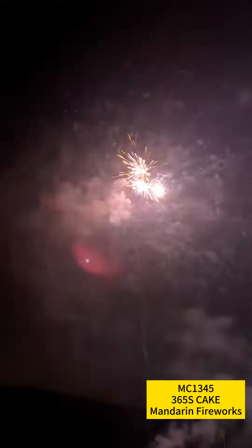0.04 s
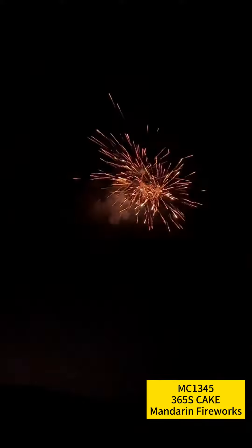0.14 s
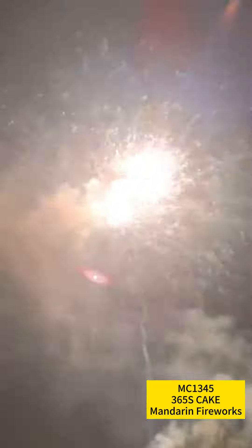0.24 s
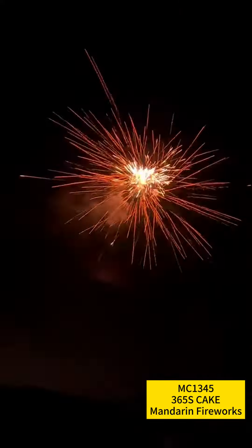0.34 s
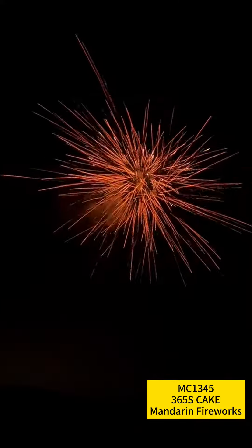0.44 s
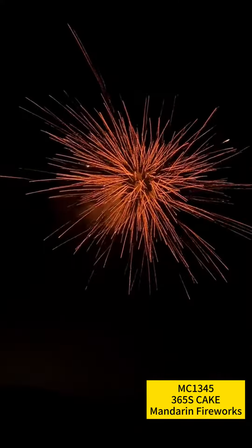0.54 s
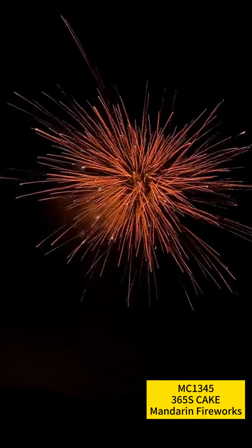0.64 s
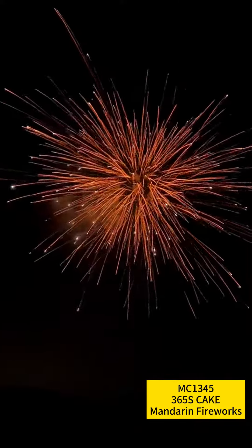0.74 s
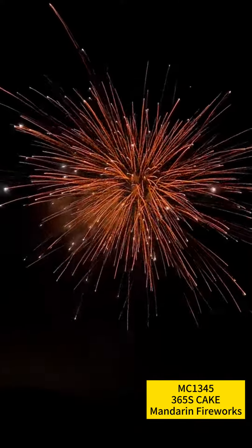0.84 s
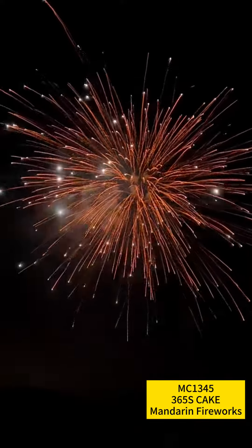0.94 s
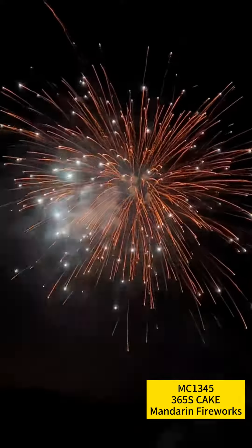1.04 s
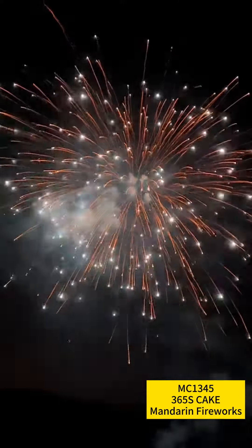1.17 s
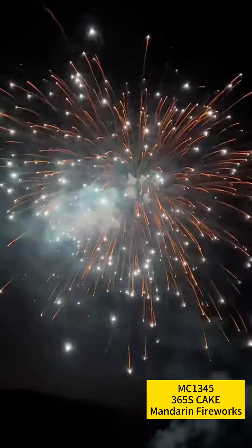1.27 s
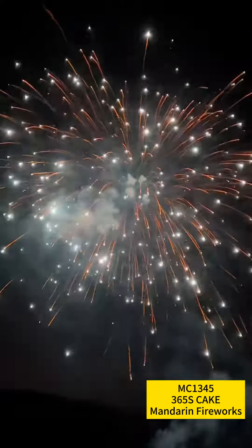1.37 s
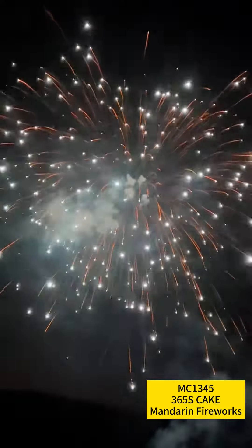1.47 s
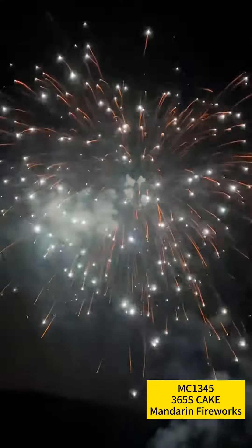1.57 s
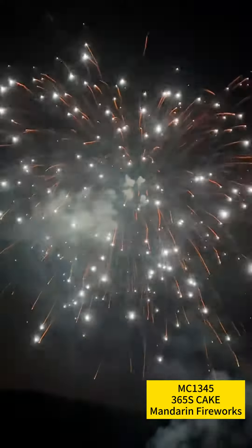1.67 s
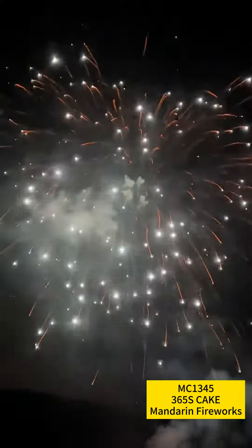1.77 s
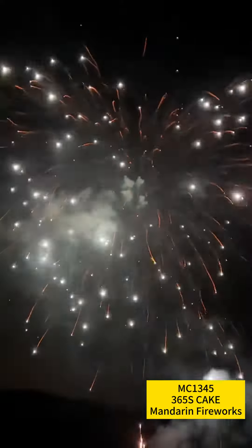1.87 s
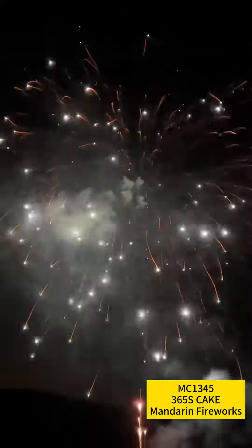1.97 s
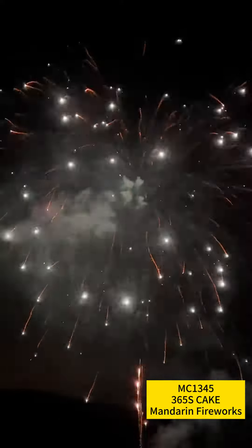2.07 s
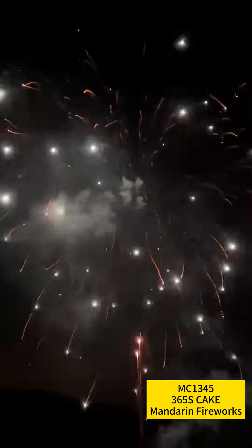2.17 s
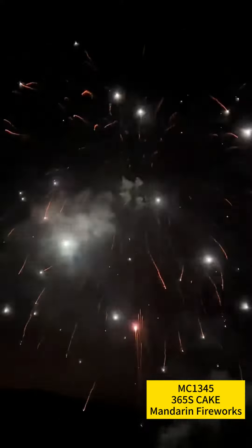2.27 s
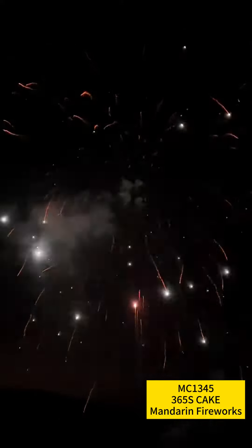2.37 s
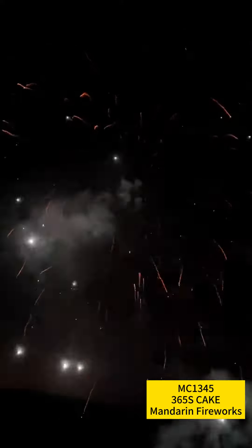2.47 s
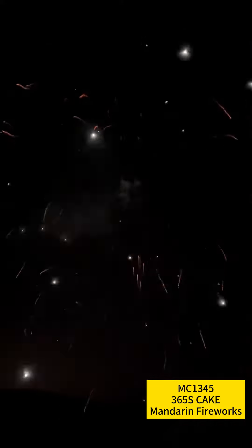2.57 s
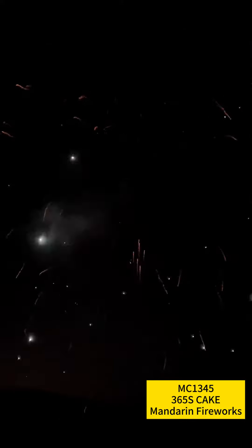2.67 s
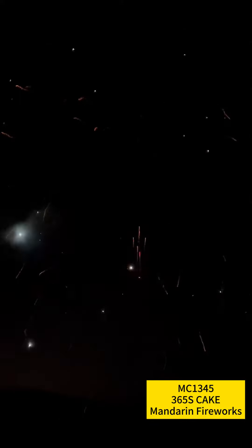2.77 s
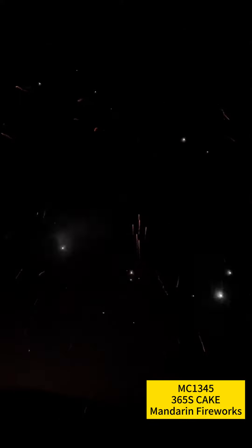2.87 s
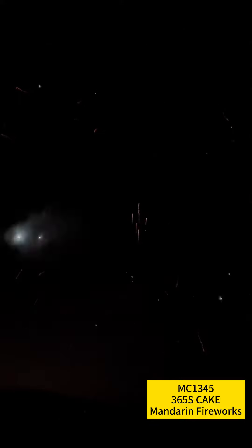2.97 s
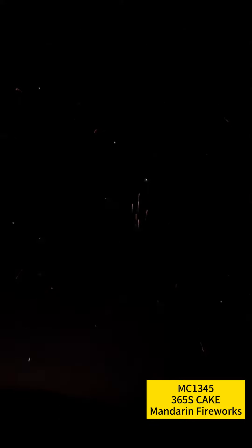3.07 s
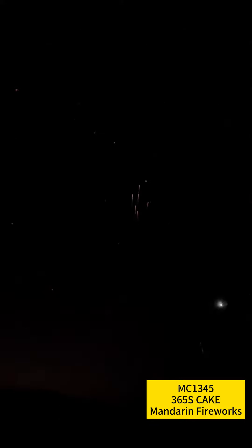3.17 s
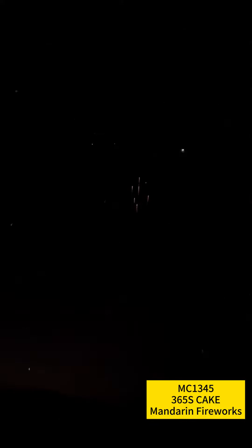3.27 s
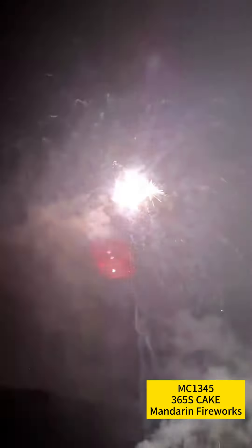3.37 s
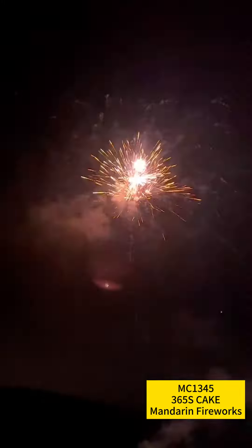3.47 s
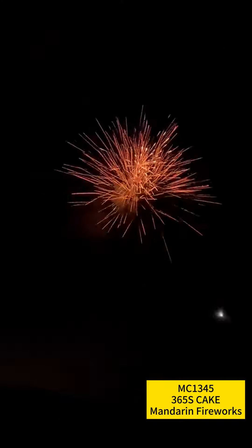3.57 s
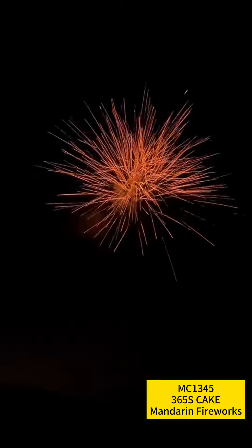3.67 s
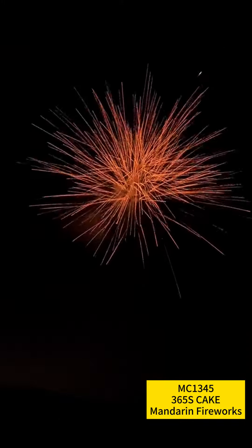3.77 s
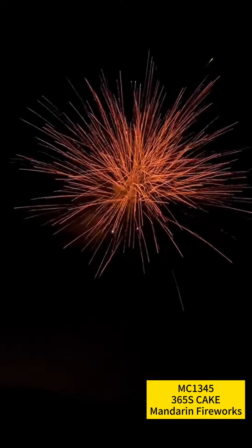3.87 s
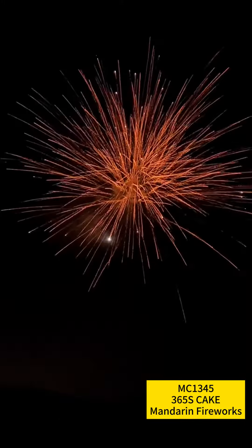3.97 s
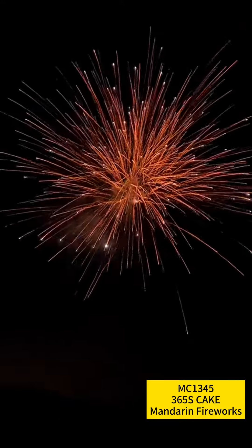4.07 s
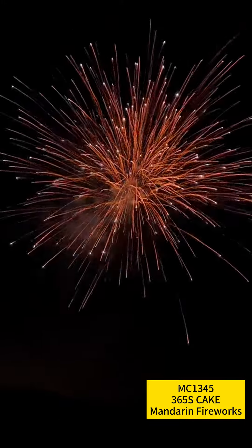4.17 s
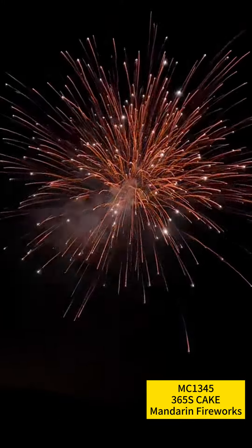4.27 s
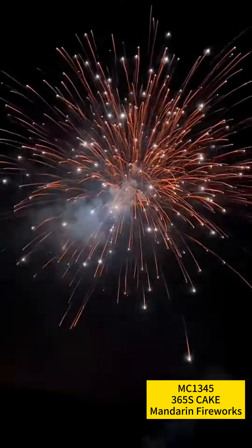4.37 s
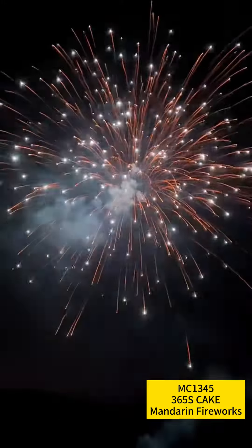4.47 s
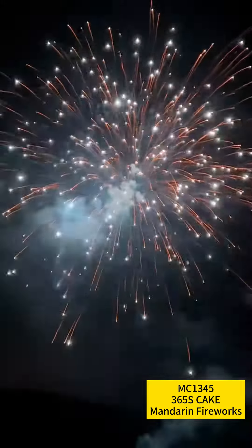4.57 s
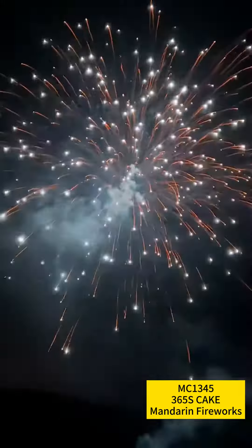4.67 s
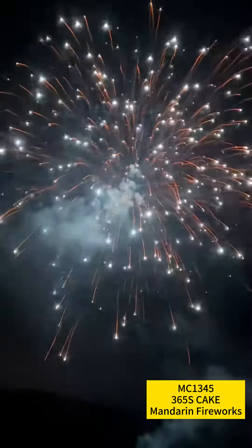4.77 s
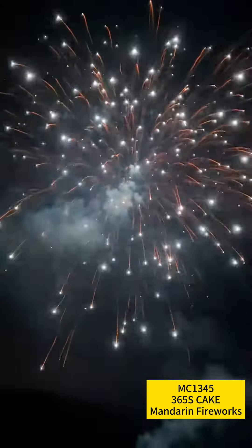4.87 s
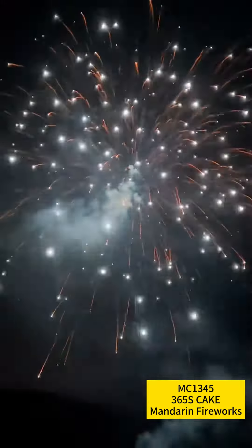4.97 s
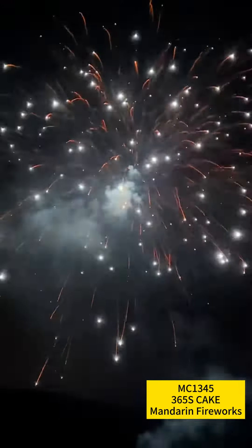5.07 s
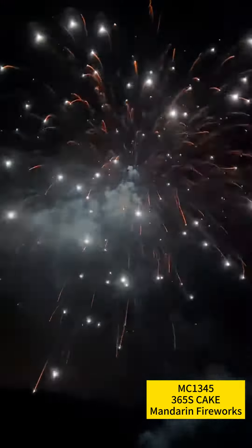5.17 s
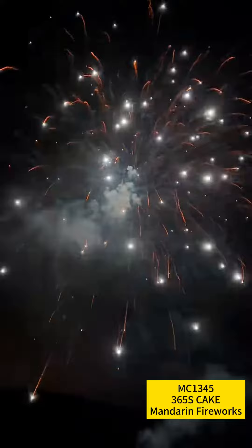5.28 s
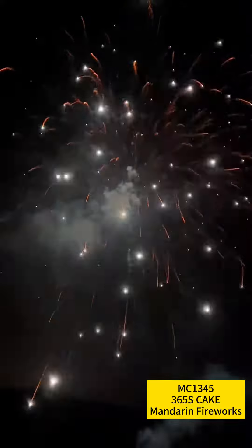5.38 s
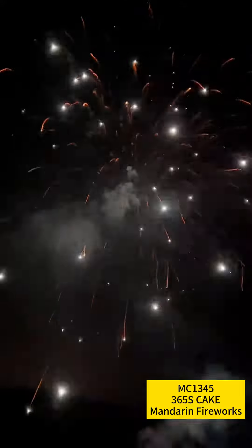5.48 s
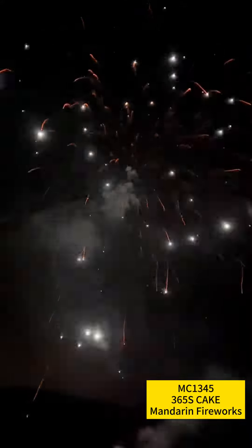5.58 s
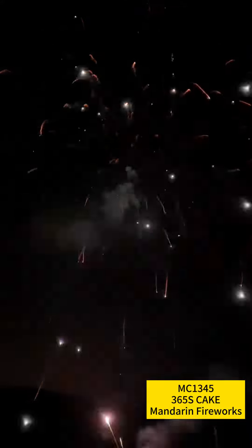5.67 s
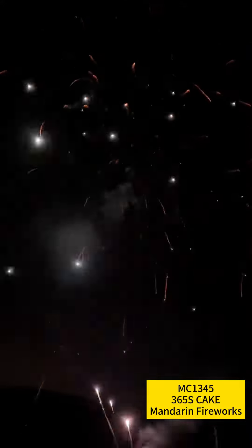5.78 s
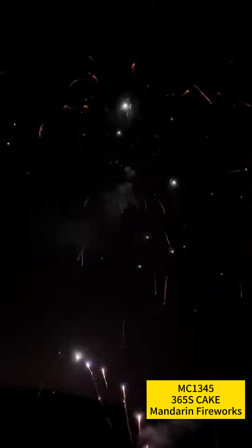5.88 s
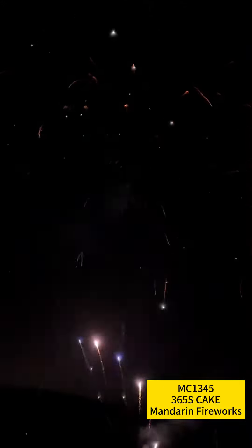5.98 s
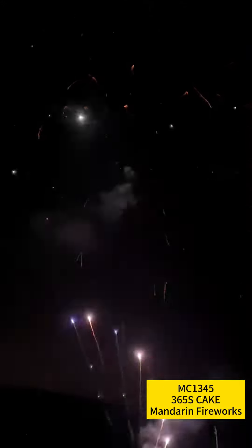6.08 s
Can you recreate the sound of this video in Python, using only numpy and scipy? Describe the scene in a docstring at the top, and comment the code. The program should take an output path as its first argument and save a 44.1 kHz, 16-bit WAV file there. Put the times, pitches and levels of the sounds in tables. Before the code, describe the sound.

Night in open country, with a faint, steady far rumble. At about 0.25 s firework shells burst overhead: three cracks almost merge, then three more follow between 0.43 and 0.53 s, extremely loud, sharp and crunchy as the small stereo recorder overloads. Ground slaps follow at once; a thunderous echo swells around 1.2 s and rolls away, losing treble. From 1.9 to 2.05 s, six quick hollow launch pops patter on the right, about 30 ms apart, each a crack over a small thump, leaving a thin airy hiss. The rumble keeps sinking until 3.6 s, when five bangs crash together within about 0.12 s, again answered by rolling land echoes, renewed near 4.4 s. From 5.6 s stronger tube pops start in a quick cluster, then come every 0.06 to 0.08 s, knocking and thumping on the right until about 6.1 s, with short echoes.

```python
"""Open country at night: a multi-shot firework cake, heard through a small stereo recorder.
Shells burst overhead in two salvos as pressure jumps with a double front; each returns from the ground
at once, from far walls later, and as filtered noise from the landscape for seconds, ever duller.
Lift charges pop on the right: a crack and a swell of noise ring tube resonances, over a low thump.
A steady far rumble of shaped noise lies beneath."""
import sys
import numpy as np
from scipy import signal
from scipy.fft import rfft, irfft, next_fast_len
from scipy.io import wavfile

SR = 44100
rng = np.random.default_rng(int(sys.argv[2]) if len(sys.argv) > 2 else 0)


def inscribe(sig):
    """Save sig as 16-bit PCM at rate SR to the path in sys.argv[1].

    A 1-D sig is mono; a 2-D sig holds one channel per row.
    Samples are clipped to [-1, 1] before scaling.
    """
    pcm = np.round(np.clip(np.atleast_2d(sig).T, -1, 1) * 32767)
    wavfile.write(sys.argv[1], SR, pcm.astype(np.int16))


N = 270774
LEFT_RIGHT = np.array([[1], [-1]])   # sign of a level difference in the two channels

# Shell bursts overhead: [t/s, relative level/dB, blast length/ms, left minus right/dB,
# second front delay/ms, second front level/dB, ground bounce delay/ms, bounce level/dB,
# bounce tick level/dB, tick delay/ms, extra cliff delay/ms, cliff echo level/dB,
# near land scatter level/dB (also sets the overload hash), far land scatter level/dB]
BURST_EVENTS = [(0.2443, -6.5, 1.76, -8, 0.73, -2, 13.5, -21.5, -23.5, 12, -0.1, -25.5, -2, -0.5),
                (0.2594, -13, 2.8, 6, 0.62, -11.5, 11.7, -9, 7.5, 11.6, 0.6, -14.5, 1.5, -1.5),
                (0.286, -3.5, 0.63, 5, 0.75, -8.5, 12.6, -12, -15, 12, -1.1, -23, -3, -6),
                (.4320, -2.5, 1.87, 3, 0.66, -7, 11.6, -14, -7, 12.5, 0.9, -24, -1.5, 0.5),
                (0.5059, -0.5, 1.6, 1.5, 0.64, 0, 12, -13.5, -13.5, 13.4, -3, -25, -1, -6.5),
                (0.5337, -5, 0.72, 6.5, 0.93, -7.5, 13, -10.5, -3.5, 13.4, 2, -22.5, -3, -8),
                (3.597, 0.5, 1.77, 2.5, 0.71, -1, 11.3, -21.5, -15, 12.3, 0.2, -26.5, 1.5, 3),
                (3.6172, -8, 1.43, 8, 1.07, -6.5, 13, -7, -1, 11.5, 0.7, -14, -3.5, 1.5),
                (3.62, -16, 2.4, -1, 0.7, 4, 15, -24, -2, 11.4, 3, -14.5, -5.5, -3),
                (3.6686, -4.5, 2, 4.5, 1.37, -11, 13.4, -18, -8, 12.2, 0.7, -22.5, -3, 1),
                (3.72, -6.5, 1.94, 4, 1.53, -15, 11.3, -14, -9, 13.3, -3.5, -18, -5, -10.5)]
# Lift charges in the tubes: [t/s, pop level/dB, thump level/dB, left minus right/dB,
# ground bounce level/dB, bounce delay/ms, land scatter level/dB,
# first, second, fourth and fifth resonance f/Hz, extra level of each of five resonances/dB]
LIFT_EVENTS = [(1.8976, -21, -17, -3.5, -4, 6.2, -18.5, 1040, 2250, 4300, 6250, 4, -2, 5, -10, 2),
               (1.9307, -16.5, -13, -6, -1, 6.7, -14, 990, 2500, 5240, 6500, 4, -2.5, 4, -8, -11),
               (1.9563, -17.5, -17, -8, -5, 6.6, -14, 947, 2220, 4140, 6200, 1.5, -4, 4, -2, -8),
               (1.9848, -18, -18.5, -3, -2.5, 7, -20.5, 1080, 2170, 5000, 6000, 4, -5.5, 5, -1, 21),
               (2.0156, -17.5, -15.5, -7.5, -3, 7, -19, 950, 2310, 4400, 6200, 3.5, -1.5, 1, 4.5, 0),
               (2.0458, -17.5, -18.5, -5, -6.5, 7, -17, 940, 2260, 5430, 6250, 7.5, 2, 6, 3.5, 3),
               (5.609, -10, -39, -5.5, 3, 7.6, -11.5, 1100, 2330, 4270, 6000, -10, -5.5, 4.5, -8, -1),
               (5.6302, -13.5, -27, -10, -8, 6.5, -15, 1090, 2550, 4650, 6950, -10, -1, 3.5, 1, -5),
               (5.6423, -17, -14.5, -8.5, -1, 5.8, -16, 920, 2340, 4120, 7000, 6, 1, 13.5, 3, -5),
               (5.7301, -10, -12, -5, 0, 6.2, -8, 1130, 2320, 5360, 6500, 2.5, -6.5, 6, -4.5, -19),
               (5.7855, -13.5, -12, -8, 0.5, 6.4, -12.5, 900, 2160, 4700, 6300, 4.5, -3.5, 2, -12, -16),
               (5.8659, -14, -11, -2.5, -4.5, 7, -12, 925, 2680, 5150, 6160, 1.5, -5.5, 9, 2.5, -13),
               (5.9403, -10, -11, -5, -2.5, 6.6, -9.5, 950, 2040, 4930, 7100, -0.5, -12.5, 2, -1, 14.5),
               (6.0126, -9.5, -9.5, -7, 2.5, 6.1, -11, 980, 2330, 4300, 6940, -1.5, -8.5, 3.5, -12, 4),
               (6.0959, -8.5, -10, -5, -0.5, 6.3, -7, 970, 2360, 5240, 6500, 0, -1.5, 8, -7, -21)]


def from_db(db):
    """Amplitude ratio of a level: 20 dB are a factor of ten."""
    return np.exp(np.asarray(db) * (np.log(10) / 20))


def rms_one(x):
    """Normalise the effective value (root mean square) to 1."""
    return x / np.sqrt(np.mean(x ** 2) + 1e-20)


def at_hz(points, hz):
    """Interpolate a spectrum linearly along logarithmic frequency."""
    points = np.array(points)
    return np.interp(np.log(hz), np.log(points[:, 0]), points[:, 1])


def butter(x, hz, kind, order=2):
    """Butterworth filter: maximally flat passband."""
    sections = signal.butter(order, hz, kind, fs=SR, output="sos")
    return signal.sosfilt(sections, np.asarray(x) + 1e-18)


def resonance(x, hz, width_hz):
    """Damped resonator: a pole pair passes a band around hz with a peak gain of about 1."""
    r = np.exp(-np.pi * width_hz / SR)
    zeros = np.array([1, 0, -1]) * (1 - r * r) / 2
    poles = [1, -2 * r * np.cos(2 * np.pi * hz / SR), r * r]
    return signal.lfilter(zeros, poles, x + 1e-18)


def later(x, s):
    """Propagation delay of s seconds."""
    lag = round(s * SR)
    return np.concatenate([np.zeros(lag), x[:N - lag]])


def drift(rate_hz):
    """Slow random fluctuation of rms 1: white noise through two equal low-pass poles."""
    r = np.exp(-80 * np.pi * rate_hz / SR)   # one step spans 40 samples
    noise = rng.standard_normal(N // 40 + 2002)
    slow = signal.lfilter([1], [1, -2 * r, r * r], noise)[2000:]
    return np.interp(np.arange(N) / 40, np.arange(len(slow)), rms_one(slow))


def clicks(rows, column):
    """Impulse excitation: one impulse an event, its level taken from a column."""
    out = np.zeros(N)
    for row in rows:
        out[round(row[0] * SR)] += from_db(row[column])
    return out


def blast(length_ms):
    """Blast wave: a pressure jump decays through zero after length_ms into a suction phase."""
    u = np.arange(SR // 20) / SR / (length_ms / 1000)
    return (1 - u) * np.exp(-u)


def puff(hits, fade_s):
    """Exponential decay: dying noise after each hit, partly own to each channel."""
    r = np.exp(-1 / (fade_s * SR))
    shared, own = rng.standard_normal(N), rng.standard_normal((2, N))
    envelope = signal.lfilter([1], [1, -r], hits + 1e-18)
    return envelope * (0.41 * shared + 0.2 * own)


def banded_noise(spectrum, patchy_db, high_grain, shape=lambda hz: 0, octaves=.5):
    """Partly coherent noise in bands: each has its level over time and its left-right correlation."""
    # Coherence of the channels: [f/Hz, left-right correlation]
    likeness = [(60, 1), (180, 0.97), (550, 0.58), (1650, 0.03), (4970, 0.63), (15000, 0.16)]
    # Balance of the channels: [f/Hz, left minus right/dB]
    balance = [(60, 1), (240, -1), (950, -1.5), (3770, -1), (15000, 2.5)]
    out, power, together = 0, 0, drift(25)
    edges = 30 * 2 ** np.arange(0, 9.1, octaves)
    white = rng.standard_normal((2, 2, N))   # neighbouring bands use different noise
    for k, (low, high) in enumerate(zip(edges, edges[1:])):
        mid, side = butter(white[k % 2], [low, high], "band", order=3)
        hz = np.sqrt(low * high)
        alike = np.clip(at_hz(likeness, hz), -1, 1)
        lean = from_db(at_hz(balance, hz) / 2 * LEFT_RIGHT)
        # full fluctuation below 300 Hz, sinking above it to the share high_grain
        grain_db = patchy_db * np.clip(300 / hz, high_grain, 1)
        gain = from_db(shape(hz) + grain_db * (1.06 * together + 0.4 * drift(30)))
        stereo = np.sqrt(1 + alike) * mid + np.sqrt(1 - alike) * side * LEFT_RIGHT
        out = out + gain * lean * stereo
        power += from_db(2 * at_hz(spectrum, hz)) * (high - low) * 4 / SR
    padded = next_fast_len(N + SR // 4)
    colour = from_db(at_hz(spectrum, np.arange(padded // 2 + 1) * SR / padded + 1))
    return irfft(rfft(out, padded) * colour, padded)[:, :N] / np.sqrt(power)


def overlap_db(events, answer_db):
    """Incoherent superposition: each event starts the same answer, and their powers add."""
    steps = np.arange(0, N + 64, 64) / SR
    power = sum(from_db(2 * (db + answer_db(steps - s))) * (steps > s) for s, db in events)
    return np.interp(np.arange(N) / SR, steps, 10 * np.log10(power + 1e-12))


def wall(x, delay_s, db, low_hz, high_hz):
    """Specular echo: one distant surface returns a band of the sound."""
    return from_db(db) * later(butter(x, [low_hz, high_hz], "band"), delay_s)


def night_rumble():
    """Stationary noise: a lasting far rumble with a fixed spectrum and small fluctuations."""
    # Colour of the rumble: [f/Hz, relative level per Hz/dB]
    rumble_colour = [(18, -37), (30, -1.5), (122, -4.5), (325, -1.5), (510, -4), (1260, -8), (1540, -18),
                     (2470, -23.5), (4750, -39.5), (6100, -36.5), (6570, -41), (12000, -55), (15600, -74),
                     (22000, -120)]
    return from_db(-55.5) * banded_noise(rumble_colour, patchy_db=1.2, high_grain=.3, octaves=1)


def bursts():
    """Blast waves and reflection: double fronts, overload hash, a ground bounce, far walls and a cliff."""
    # Far walls that return a band of each burst: [delay t/s, level/dB, low f/Hz, high f/Hz]
    burst_walls = [(0.189, -48, 81.2, 398), (0.228, -38, 69.6, 350)]
    waves, shaded, bounced, ticks, cliff = np.zeros((5, 2, N))

    def add(track, s, wave):
        """Linear superposition of a wave that arrives at s seconds."""
        start = round(s * SR)
        track[:, start:start + wave.shape[1]] += wave

    for (s, db, length_ms, pan_db, second_ms, second_db, bounce_ms, bounce_db,
         tick_db, tick_ms, cliff_ms, cliff_db, *_) in BURST_EVENTS:
        wave = from_db(db + 15.5 + pan_db / 2 * LEFT_RIGHT) * blast(length_ms)
        add(ticks, s + tick_ms / 1000, from_db(tick_db) * wave)
        # the second front carries the highs only
        lag = round(second_ms / 1000 * SR)
        wave[:, lag:] += from_db(second_db) * butter(wave[:, :-lag], 1380, "high")
        add(waves, s, wave)
        # from overhead the body of the recorder shades the front; longer blasts are slightly duller
        add(shaded, s, butter(wave, 3830 / length_ms ** 0.084, "low", order=4))
        add(bounced, s + bounce_ms / 1000, from_db(bounce_db) * wave)
        add(cliff, s + .726 + cliff_ms / 1000, from_db(cliff_db) * wave)
    # something close to the recorder returns the highs of the front
    near_echo = from_db(-18.5) * butter([later(side, .0024) for side in shaded], 1420, "high")
    # the bounce comes as a dull body and a bright tick, later and at another level in the right port
    bounced = butter(bounced, 1500, "low") + butter(ticks, [4550, 7600], "band")
    ground = np.array([bounced[0], later(bounced[1], 0.00034)]) * from_db(-11 / 2 * LEFT_RIGHT)
    # ragged overload noise for a few ms on each burst
    ragged = puff(clicks(BURST_EVENTS, column=-2), fade_s=0.003)
    overload_hash = from_db(-13.5) * butter(ragged, 1300, "high", order=1)
    far = butter(cliff.mean(axis=0), [144, 365], "band")
    far = far + sum(wall(waves.mean(axis=0), *row) for row in burst_walls)
    return shaded + near_echo, ground, overload_hash, far


def burst_scatter():
    """Diffuse scattering and air absorption: land answers each burst, the treble sinking with delay."""
    # Colour of the scatter: [f/Hz, relative level per Hz/dB]
    land_colour = [(18, -49), (30, -11), (70, 0), (124, -2.5), (245, 1), (345, -1), (540, -11.5),
                   (913, -9.5), (1350, -14.5), (1750, -20.5), (2410, -25), (3310, -35.5), (6380, -58.5),
                   (10200, -69.5), (16000, -80.5)]
    # Stretches of land, near to far: [delay of the loudest moment t/s, level/dB, swell/(dB/s),
    # fade/(dB/s), bass lift/dB, middle lift/dB, treble lift/(dB/octave)]
    stretches = [(0.016, -21, -8.5, 336.5, 5.5, 0.5, -0.6), (0.062, -34.5, 202, 47, 8.5, -3.5, 0.6),
                 (.3, -38, 108.5, 92, 15, 1, 1.2), (.56, -46.5, 136, 42, 13.5, -18.5, 4.5),
                 (.75, -41, 48.5, 14, 0.5, -1, 1.06), (.92, -49.5, 57, 37.5, -2.5, 5.5, 1.5),
                 (1.3, -50, 44.5, 28.5, -2, 5.5, 2.4), (1.7, -51, 2.5, 11, -5, 7, 1.5),
                 (3.1, -70.5, 20, 5, -6.5, 12, 0)]
    # Land that only the later salvo reaches: columns as above
    later_stretches = [(.93, -52.5, 60, 45.14, 0.5, 4, 0.5), (1.33, -50.5, 69, 55.4, 0.55, 7.8, -1.7)]
    # Gain of the later salvo, elsewhere in the sky, on each far stretch: [level/dB]
    later_gains = [-3.5, 0.5, 0, 1, 2.5, -2, -1]
    near, far = stretches[:2], stretches[2:]
    moved = [(at, db + gain_db, *rest) for (at, db, *rest), gain_db in zip(far, later_gains)]
    moved = moved + later_stretches
    near_events = [(row[0], row[-2]) for row in BURST_EVENTS]
    first_salvo = [(row[0], row[-1]) for row in BURST_EVENTS if row[0] < 3]
    later_salvo = [(row[0], row[-1]) for row in BURST_EVENTS if row[0] > 3]

    def level_db(hz):
        """Energy addition of the near and far answers in one band."""
        bass, middle = np.clip(np.log2(250 / hz), 0, 1), np.clip(np.log2(hz / 400), 0, 1)
        treble = max(np.log2(hz / 1500), 0)   # octaves above 1500 Hz

        def answer_db(s, lands):
            """Rise and decay of the scatter at s seconds after a burst."""
            s = np.maximum(s, 0)
            power = 0
            for at, db, swell, fade, bass_db, middle_db, treble_db in lands:
                peak_db = db + bass_db * bass + middle_db * middle + treble_db * treble
                slope_db = swell * np.maximum(at - s, 0) + fade * np.maximum(s - at, 0)
                power = power + from_db(2 * (peak_db - slope_db))
            # air: the tilt per octave sinks from 11.5 to -6.5 dB with a time constant of 1 s
            tilt_db = -6.5 + (11.5 + 6.5) * np.exp(-s)
            return 10 * np.log10(power + 1e-30) + tilt_db * treble

        near_db = overlap_db(near_events, lambda s: answer_db(s, near))
        first_db = overlap_db(first_salvo, lambda s: answer_db(s, far))
        later_db = overlap_db(later_salvo, lambda s: answer_db(s, moved))
        return 10 * np.log10(from_db(2 * near_db) + from_db(2 * first_db) + from_db(2 * later_db))

    return banded_noise(land_colour, patchy_db=0.78, high_grain=.9, shape=level_db)


def lifts():
    """Tube resonance: crack and noise ring the mouth, a low push swings back, ground and walls reflect."""
    # Bandwidth of the five tube resonances: [width f/Hz]
    tube_widths = (424, 347, 250, 484, 500)
    # Common level of the five tube resonances: [level/dB]
    tube_levels = (2.5, 6.5, -5.5, -5, -22)
    # Far walls that return a band of an impulse per lift: [delay t/s, level/dB, low f/Hz, high f/Hz]
    lift_walls = [(.596, -1, 2050, 2550), (.83, -8, 2100, 2550), (.41, -8, 2050, 2550),
                  (.596, -29, 5300, 7200)]
    swell_s, fade_s = 0.0018, 0.0045   # noise swells for about 2 ms up to the crack, then dies away
    mouth, ground, span = np.zeros((2, N + SR)), np.zeros((2, N + SR)), SR // 20
    lead = round(.006 * SR)
    since = (np.arange(span) - lead) / SR
    envelope = np.exp(np.minimum(since / swell_s, -since / fade_s))
    crack = np.concatenate([np.zeros(lead), blast(0.25)])[:span]
    for (s, db, _, pan_db, ground_db, ground_ms, _,
         first_hz, second_hz, fourth_hz, fifth_hz, *own_db) in LIFT_EVENTS:
        noise = 0.37 * rng.standard_normal(span) + 0.34 * rng.standard_normal((2, span))
        drive = from_db(8) * crack + from_db(-1.5) * envelope * noise
        tube_hz = (first_hz, second_hz, 3570, fourth_hz, fifth_hz)   # the third is alike in all tubes
        pop = 0
        for hz, width_hz, level_db, extra_db in zip(tube_hz, tube_widths, tube_levels, own_db):
            pop = pop + from_db(level_db + extra_db) * resonance(drive, hz, width_hz)
        pop = pop * from_db(db + pan_db / 2 * LEFT_RIGHT)
        start = round(s * SR) - lead
        back = round((s + ground_ms / 1000) * SR) - lead
        mouth[:, start:start + span] += pop
        ground[:, back:back + span] += from_db(ground_db) * pop
    mouth, ground = mouth[:, :N], butter(ground[:, :N], 2900, "low", order=1)
    # the low push, followed by a swing of opposite sign
    push = signal.fftconvolve(clicks(LIFT_EVENTS, column=2), blast(2.2))[:N]
    thump = butter(from_db(0.5) * later(push, 0.00627) - push, 252, "low")
    # the gas column of a tube rings on the push
    thump = thump + from_db(-2) * resonance(thump, 184, 67)
    echoes = sum(wall(clicks(LIFT_EVENTS, column=6), *row) for row in lift_walls)
    return mouth + ground + thump + echoes


def lift_scatter():
    """Reverberant decay: the land answers each lift with noise that fades at a rate set by frequency."""
    # Colour of the scatter: [f/Hz, relative level per Hz/dB]
    lift_colour = [(18, -32), (30, 9), (273, -5.5), (540, -14.5), (962, -9.5), (1430, -24), (2060, -18.5),
                   (3000, -20), (4300, -28.5), (6210, -35), (11400, -35.5), (16000, -64)]
    # Fading of the scatter: [f/Hz, time to fall by 60 dB t/s]
    lift_fade = [(60, 1.47), (300, 1.1), (1000, 2.2), (2500, 0.85), (6000, 0.84), (12000, 0.11)]
    events = [(row[0], row[6]) for row in LIFT_EVENTS]

    def level_db(hz):
        """Exponential decay in one band, summed over the lifts."""
        return -23.5 + overlap_db(events, lambda s: -60 * np.maximum(s, 0) / at_hz(lift_fade, hz))

    return banded_noise(lift_colour, patchy_db=0.8, high_grain=0.67, shape=level_db)


def lingering_hiss():
    """Narrow-band reverberation: the second tube resonance lingers in the scatter of the lifts."""
    hz, width_hz, t60_s = 2280, 380, 9
    hiss = resonance(rng.standard_normal((2, N)), hz, width_hz)
    hiss = resonance(hiss, hz, width_hz)
    events = [(row[0], row[6]) for row in LIFT_EVENTS]
    level_db = -51.5 + overlap_db(events, lambda s: -60 * s / t60_s)
    return from_db(level_db) * rms_one(hiss)


def treble_resonance(x):
    """Resonance: a band near 6.5 kHz rings on the burst hash, the lifts and both scatters."""
    return x + from_db(11.5) * resonance(x, 6454, 1500)


def scene():
    """Superposition of all sources at the microphone ports."""
    night = night_rumble()
    waves, ground, overload_hash, walls = bursts()
    ringing = treble_resonance(overload_hash + burst_scatter() + lifts() + lift_scatter())
    return night + waves + ground + walls + ringing + lingering_hiss()


def record(dry):
    """Saturation and dispersion: the capsule overloads, filters delay the lows, peaks are rounded."""
    # Crossovers of the band-splitting filters: [f/Hz]
    crossovers = (62, 160, 410, 1050)
    overload, ceiling, crossover_q = 1.124, 1.1, 1.1
    x = butter(overload * np.tanh(dry / overload), 40, "high")
    # the recorder favours one low band
    x = x + resonance(x, 320, 286)
    # all-pass filters turn a jump into a falling chirp
    for hz in crossovers:
        w = 2 * np.pi * hz / SR
        a = np.sin(w) / (2 * crossover_q)
        x = signal.lfilter([1 - a, -2 * np.cos(w), 1 + a], [1 + a, -2 * np.cos(w), 1 - a], x)
    x = ceiling * np.tanh(x / ceiling)
    # steep upper band limit at 15.8 kHz
    return signal.sosfilt(signal.ellip(12, .5, 110, 15800, fs=SR, output="sos"), x)


dry = scene()
out = record(dry)
inscribe(out)
```